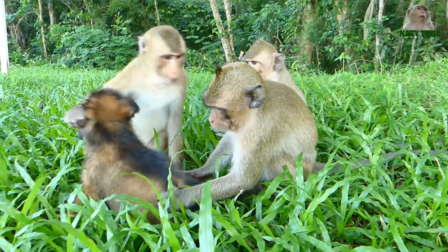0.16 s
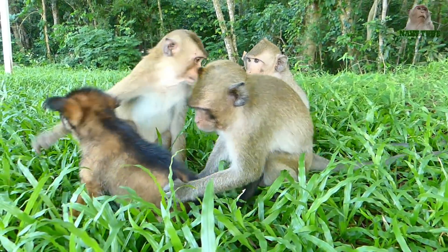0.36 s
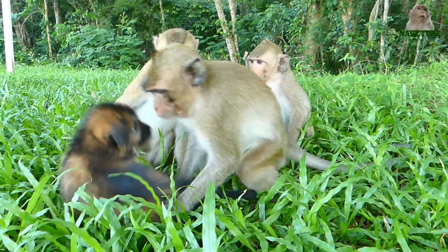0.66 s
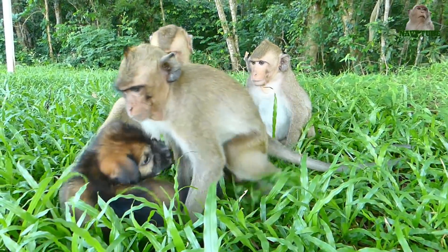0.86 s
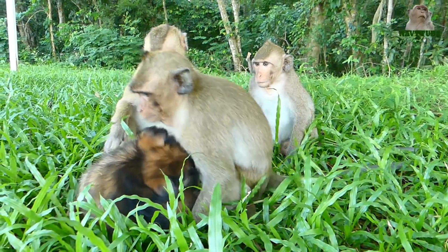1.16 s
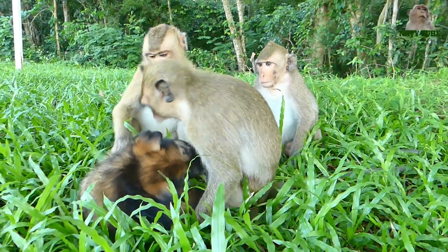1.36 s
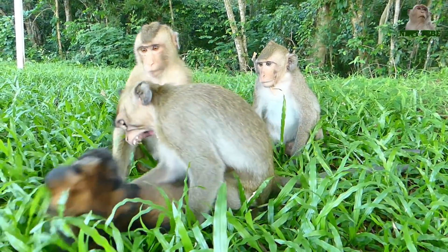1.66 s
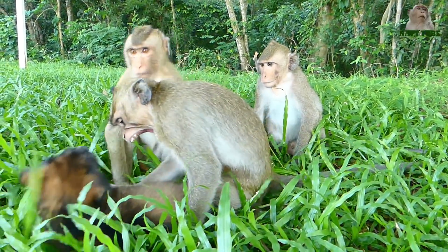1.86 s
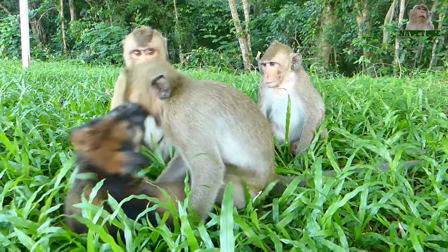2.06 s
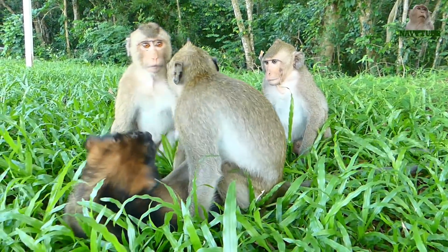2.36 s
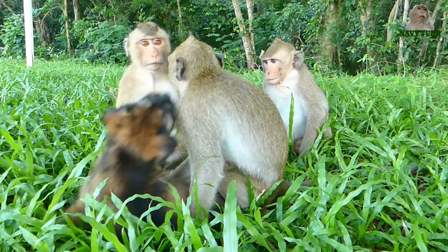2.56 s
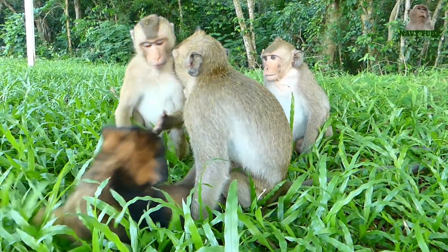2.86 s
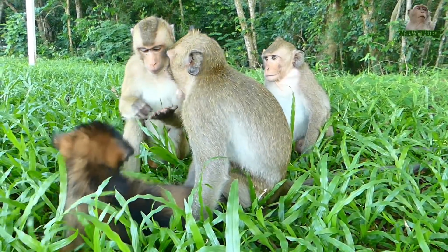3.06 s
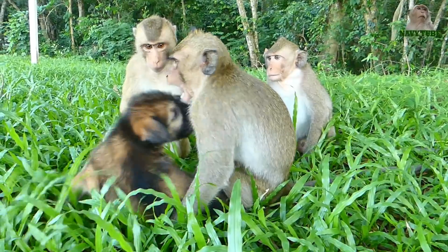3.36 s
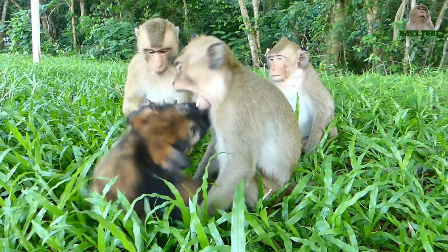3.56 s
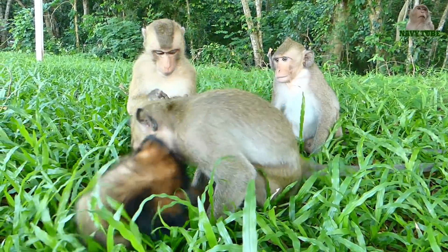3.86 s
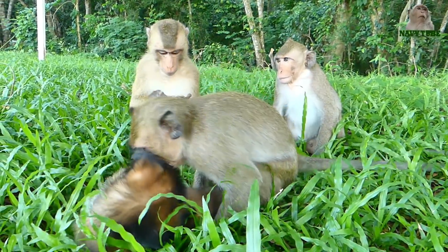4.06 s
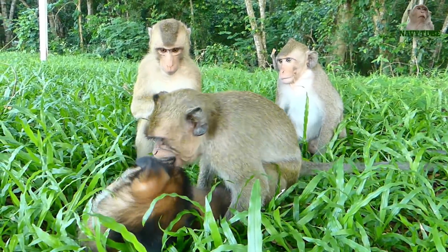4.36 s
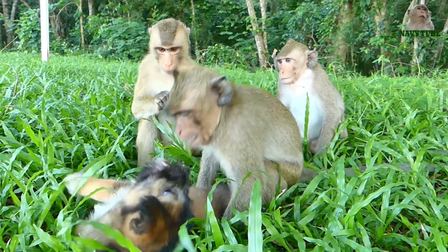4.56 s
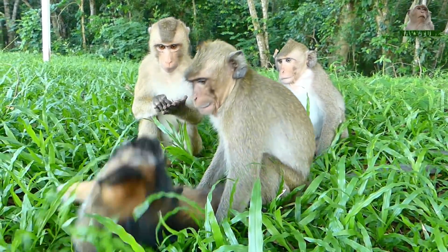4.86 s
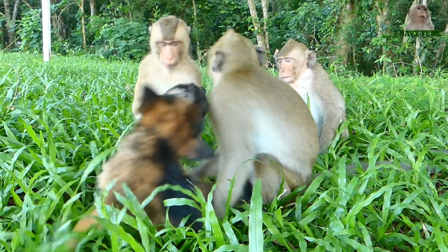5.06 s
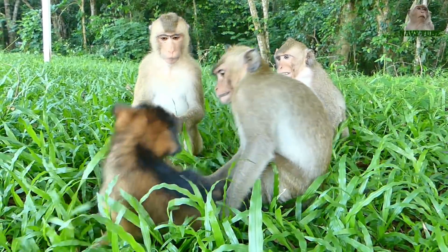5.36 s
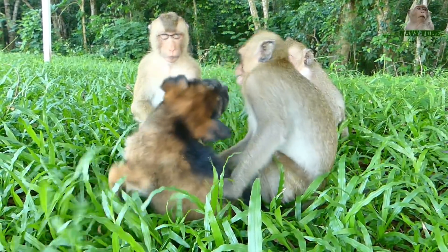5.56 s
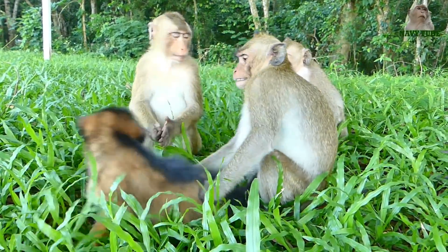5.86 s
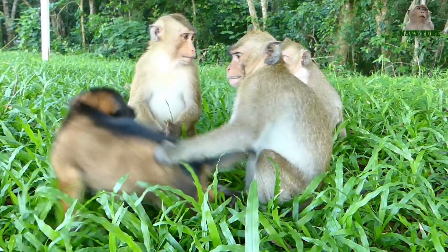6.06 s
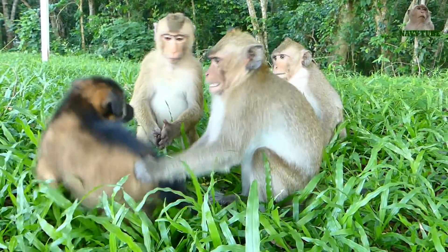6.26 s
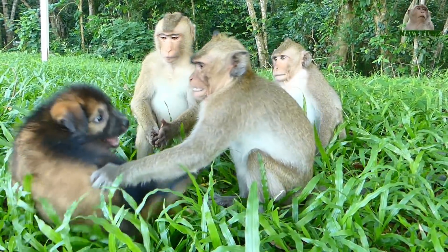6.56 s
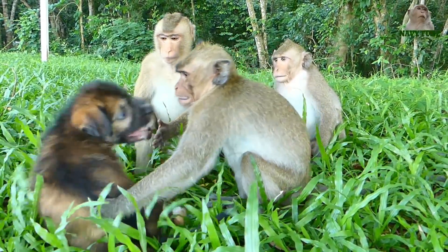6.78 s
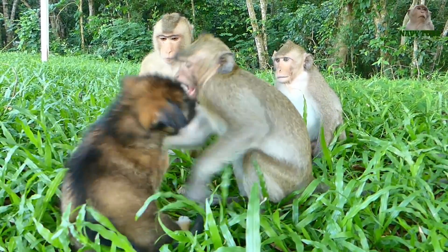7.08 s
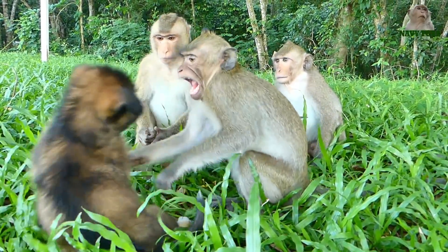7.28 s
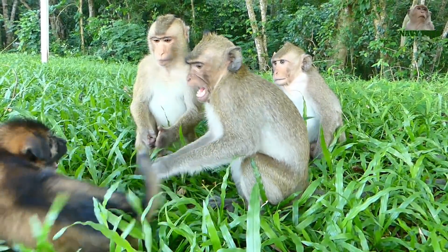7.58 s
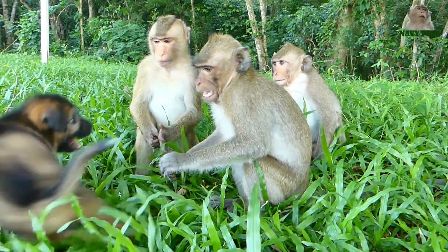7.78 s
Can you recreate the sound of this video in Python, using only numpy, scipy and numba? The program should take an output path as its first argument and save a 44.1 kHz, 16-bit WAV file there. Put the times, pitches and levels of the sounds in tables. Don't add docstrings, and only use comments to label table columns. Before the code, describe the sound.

Small engines hum beyond the trees while a young dog whimpers and yelps close by, its cries echoing, and a far horn toots.

```python
import sys
import numpy as np
from scipy import signal
from scipy.fft import rfft, irfft, next_fast_len
from scipy.io import wavfile
from scipy.ndimage import uniform_filter1d
from numba import njit

SR = 44100
rng = np.random.default_rng(int(sys.argv[2]) if len(sys.argv) > 2 else 0)


def file_out(sig):
    cols = np.atleast_2d(sig).T
    lim = np.clip(cols, -1, 1)
    pcm = np.round(lim * 32767).astype(np.int16)
    wavfile.write(sys.argv[1], SR, pcm)


def makeup_ratio(level_db):
    decades = np.asarray(level_db, float) / 20
    return 10 ** decades


N = 349260
T = np.arange(N) / SR


def read(table, t=T):
    s, *columns = np.transpose(table)
    return [np.interp(t, s, c) for c in columns]


def tone(table, hz):
    table_hz, value = np.transpose(table)
    return np.interp(np.log(hz), np.log(table_hz), value)


def unit(x):
    return x / np.sqrt(np.mean(x ** 2))


def walk(rate):
    k = int(SR / rate)
    held = np.repeat(rng.standard_normal(N // k + 1), k)
    return 1.66 * uniform_filter1d(uniform_filter1d(held, k), k)[:N]


def colour(x, table):
    size = next_fast_len(N)
    gain = makeup_ratio(tone(table, np.fft.rfftfreq(size, 1 / SR) + 1))
    return irfft(rfft(x, size) * gain, size)[..., :N]


def place(x, pan_db):
    return x * makeup_ratio(np.array([[pan_db / 2], [-pan_db / 2]]))


@njit
def svf(x, hz, width):
    y, b, l = np.empty(len(x)), 0., 0.
    for i in range(len(x)):
        g, k = np.tan(np.pi * hz[i] / SR), width / hz[i]
        v = (b + g * (x[i] - l)) / (1 + g * (g + k))
        b, l, y[i] = 2 * v - b, l + 2 * g * v, k * v
    return y


@njit
def follow(x, attack, release):
    y, e = np.empty(len(x)), 0.
    for i in range(len(x)):
        e += (x[i] - e) * (attack if x[i] > e else release)
        y[i] = e
    return y


def lines(hz, table, flutter_db, rate, blur):
    phase = 2 * np.pi * np.cumsum(hz) / SR
    total = 0
    for m, db in table:
        level = makeup_ratio(db + flutter_db * walk(rate))
        total = total + level * np.sqrt(2) * np.sin(m * phase + blur * walk(rate) + 7 * rng.random())
    return total


def bursts(rows, rise_s, fall_s):
    total = 0
    for s, hold, db in rows:
        before = np.clip((s - T) / rise_s, 0, 40)
        after = np.clip((T - s - hold) / fall_s, 0, 40)
        total = total + makeup_ratio(db) * np.exp(-before - after)
    return total


def air():
    # frequency in Hz, level in dB per Hz.
    spectrum = [(15, -61), (25, -45), (70, -13), (179, 1), (276, -8), (361, -11), (461, -16.5),
                (620, -19.5), (1010, -22.5), (1280, -22), (4100, -30.5), (4690, -30), (8050, -40.5),
                (11100, -36.5), (15800, -59)]
    # frequency in Hz, side minus mid in dB.
    spread = [(60, -20), (110, -9), (200, -9.5), (380, -6.5), (700, -8), (1290, -7), (2380, -7.5),
              (4400, -9.5), (8120, -9), (15000, -1)]
    # frequency in Hz, left minus right in dB.
    lean_db = [(60, 12), (110, -3.5), (200, 1.5), (380, 6), (700, 0.5), (1290, -0.5), (2380, 0),
               (4400, -0.5), (8120, 0.5), (15000, 1)]
    # frequency in Hz, left port's lead in radians.
    lead = [(0, 0), (260, 0.16), (690, 0.023), (4130, 0.065), (10900, -0.1), (11600, -0.0), (15700, -0.1)]
    swell = walk(1.3)
    rumble_db = -0.5 - 14.5 * np.exp(-((T - 4.7) / 2.3) ** 2)
    size = next_fast_len(N)
    f = np.fft.rfftfreq(size, 1 / SR) + 1
    mid, side = rfft(rng.standard_normal((2, size))) * makeup_ratio(tone(spectrum, f))
    side = side * makeup_ratio(tone(spread, f))
    lean = makeup_ratio(tone(lean_db, f) / 2) * np.exp(.5j * tone(lead, f))
    pair = np.array([(mid + side) * lean, (mid - side) / lean])
    out = 0
    for octave in np.arange(4, 15):
        band = irfft(pair * np.clip(1 - abs(np.log2(f) - octave), 0, 1), size)[:, :N]
        out = out + band * makeup_ratio(0.24 * swell + 1.0 * walk(6) + rumble_db * (octave < 7))
    return colour(unit(out), [(110, 0), (180, -4.5), (280, -1.5), (420, 0)]) * makeup_ratio(-35)


def engines():
    # time in seconds, firing rate in Hz.
    revs = [(1.2, 26.14), (1.55, 26.62), (1.85, 30.03), (1.97, 31), (2.26, 27.81), (2.6, 32.42),
            (2.98, 31.6), (3.29, 32.91), (3.72, 30.17), (4.1, 31.89), (4.6, 29.65), (5.07, 30.91),
            (5.47, 28.93), (5.97, 29.46), (6.61, 28.19), (6.85, 26.31), (7.28, 25.62), (7.92, 27.55)]
    # multiple of the firing rate when that is pipe_rate_hz, level in dB.
    pipe = [(1, -38), (2, -20.5), (3, -17), (4, -10), (5, -1.5), (6, 4), (7, -10.5), (8, -3.5), (9, -9.5),
            (10, -5), (11, -6.5), (12, -7), (13, -15), (14, -16), (15, -16), (16, -21), (17, -18),
            (18, -17)]
    # frequency in Hz, level in dB.
    steady_lines = [(127, -43.5), (170, -46.5), (212, -47.5), (256, -51.5), (298, -54), (357, -46.5),
                    (390, -49), (427, -51.5)]
    pipe_rate_hz = 31.1
    hz, = read(revs)
    multiples, pipe_db = np.transpose(pipe)
    ringing = [(m, np.interp(m * hz / pipe_rate_hz, multiples, pipe_db)) for m in range(1, 20)]
    near = unit(lines(hz, ringing, flutter_db=2.03, rate=9., blur=0.2))
    near *= makeup_ratio(-34 + 0.82 * (hz - pipe_rate_hz))
    near /= 1 + np.exp((0.9 - T) / 0.083)
    leaving = lines(np.ones(N), steady_lines, flutter_db=2.5, rate=6.67, blur=0.65) * makeup_ratio(2)
    leaving /= 1 + np.exp((T - 1.94) / 1)
    return place(near, 0.84) + place(leaving, 0.96)


def grass():
    # start in seconds, length in seconds, level in dB.
    rustles = [(.08, .02, -80), (.44, 0.37, -59.5), (.89, .11, -55.5), (1.39, 0.036, -80),
               (1.8, 0.098, -75), (2.05, .08, -75), (2.45, .1, -68), (2.9, 0.056, -61), (3.33, 0.057, -71),
               (3.6, 0.067, -71), (4.42, 0.15, -58), (5.24, 0.082, -51.5), (5.74, .07, -57),
               (6.18, 0.087, -59), (6.4, 0.051, -66), (7.41, 0.071, -53.5), (7.84, .1, -53.5)]
    # frequency in Hz, level in dB per Hz.
    blade_tone = [(1500, 2), (4000, 1), (7500, -1.5), (10000, -1), (12500, -5), (15000, -7)]
    ticks = rng.standard_normal((2, N)) * makeup_ratio(2.1 * rng.exponential(size=N) + 1.0 * walk(40))
    ticks = colour(ticks + 0.42 * ticks[::-1], blade_tone)
    bed = makeup_ratio(-63.5 + 1.5 * walk(4.))
    return unit(ticks) * makeup_ratio(5.5) * (bed + bursts(rustles, rise_s=0.026, fall_s=0.03))


def band_noise(hz, width):
    return svf(rng.standard_normal(N), 0 * T + hz, width)


def small_life():
    # frequency in Hz, width in Hz, level in dB.
    far_insects = [(4800, 500, -62), (11330, 1200, -69.5)]
    # length in seconds, level in dB.
    near_insect = (.28, -61)
    # length in seconds, level in dB, first pitch in Hz, sag in Hz per second.
    chip = (.04, -46, 6040, 2200)
    chorus = 0
    for hz, width, db in far_insects:
        narrow = svf(band_noise(hz, 1. * width), 0 * T + hz, 1. * width)
        chorus = chorus + unit(narrow) * makeup_ratio(db + 0.46 * walk(5.4))
    buzz = unit(band_noise(9200, 2200.)) * bursts([(.42, *near_insect)], .05, 0.059)
    chip_s = 7.8
    hold, db, hz, sag = chip
    pitch = hz - sag * np.clip(T - chip_s, 0, .07)
    bird = lines(pitch, [(1, 0)], flutter_db=2.5, rate=64.5, blur=.8)
    bird *= bursts([(chip_s + .01, hold, db)], .004, .013)
    return place(bird, 1.5) + place(buzz, .6) + chorus


def horn():
    # start in seconds, length in seconds, level in dB.
    blasts = [
        (4.085, 0.41, -36.5),
        (4.6, .2, -38),
        (4.855, 0.062, -28.5),
        (5.28, 0.0992, -32),
        (7.268, 0.18, -33),
    ]
    # pitch in Hz, level in dB.
    diaphragms = [
        (433.2, 0),
        (428.6, -3),
    ]
    # multiple of the pitch, level in dB.
    bell = [(6, -17), (7, -12), (8, -5.5), (9, -1), (10, -9), (11, -27), (19, -21), (20, -29.5), (21, -19)]
    attack_s, tail_db_per_s = 0.004, 25.5
    direct = bursts(blasts, attack_s, 0.0051)
    tail = makeup_ratio(-8.5) * bursts(blasts, attack_s, 20 / np.log(10) / tail_db_per_s)
    (high_hz, high_db), (low_hz, low_db) = diaphragms
    high = lines(high_hz + 0 * T, bell, flutter_db=3.5, rate=42., blur=1.6)
    low = lines(low_hz + 0 * T, bell[1:5] + bell[-1:], flutter_db=3.5, rate=33., blur=1.3)
    return (makeup_ratio(high_db) * high + makeup_ratio(low_db) * low) * np.maximum(direct, tail) * makeup_ratio(-9.0)


def cry(table, throat, bright, chest_hz, chest_width, chest_db, nasal, hard_db, pan_db):
    # multiple of its resonance, width in Hz, level in dB.
    cavities = [(1.43, 560, -4.5), (1.85, 910, -6.5)]
    (s0, hz0, db0, *rest0), (s1, hz1, db1, *rest1) = table[0], table[-1]
    onset = (s0 - .004, hz0, db0 - 33, *rest0)
    dying = (s1 + .018, hz1 * (1 - 0.196), db1 - 32, *rest1)
    table = [onset, *table, dying]
    start, stop = int(table[0][0] * SR), int(table[-1][0] * SR)
    hz, db, rough, mouth_hz = read(table, T[start:stop])
    rough = np.clip(rough, 0, 1)

    rest_hz, with_mouth, with_pitch = throat
    throat_hz = rest_hz + with_mouth * (mouth_hz - mouth_hz.mean()) + with_pitch * (hz - hz.mean())
    throat_hz = np.clip(throat_hz, 900, 6000)
    open_db, with_effort, octave_db = bright
    bright_db = open_db + with_effort * (db - db.max()) + octave_db * np.log2(hz / hz.mean())

    pitch_chance, size_chance = rng.standard_normal((400, 2)).T
    breath = rng.standard_normal(SR // 2)[:len(hz)]
    steady = (np.cumsum(hz) / SR).astype(int)
    phase = np.cumsum(hz * np.exp(.24 * rough * pitch_chance[steady])) / SR
    size = makeup_ratio(5.4 * rough * size_chance[(phase + .5).astype(int)])

    k = np.arange(1, 50)[:, None]
    reach = 1 / (1 + (k * hz / 7150) ** 40) + makeup_ratio(-12) * np.exp(-((k * hz - 12500) / 2500) ** 2)
    reach *= makeup_ratio(hard_db * np.clip(np.log2(k * hz / 2400), 0, 2))
    snaps = np.sum(np.cos(2 * np.pi * k * phase) * reach, axis=0) / np.sqrt(3600 / hz)
    hiss = svf(svf(breath, 0 * hz + 3000, 5000.), 0 * hz + 3500, 5500.)
    puff = np.cos(np.pi * phase) ** 2 * hiss
    folds = size * snaps + 1.8 * (rough + 0.034) * makeup_ratio(hard_db) * puff

    skull = 0
    for n, (multiple, width, cavity_db) in enumerate(cavities):
        skull = skull + (-1) ** n * makeup_ratio(cavity_db) * svf(folds, multiple * throat_hz, 1. * width)
    upper = makeup_ratio(0.31 * (db + 12)) * skull - svf(svf(folds, throat_hz, 1950.), throat_hz, 930.)
    mouth = svf(svf(folds, mouth_hz, 0.16 * mouth_hz.mean()), mouth_hz, 1.07 * mouth_hz.mean())
    voice = mouth + makeup_ratio(bright_db) * upper
    voice -= makeup_ratio(chest_db) * svf(folds, 0 * hz + chest_hz, 1. * chest_width)
    voice -= nasal * svf(voice, 0 * hz + 923, 340.)
    voice /= np.sqrt(uniform_filter1d(voice ** 2, int(0.011 * SR)) + 1e-9)
    return place(np.pad(-voice * makeup_ratio(db), (start, N - stop)), pan_db)


def puppy():
    # time in seconds, pitch in Hz, level in dB, roughness 0-1, mouth resonance in Hz.
    whine_rise = [(4.274, 409.5, -43, 0.7, 1510), (4.285, 416.6, -28, 0.35, 1579),
                  (4.3, 424, -21.5, 0.13, 1650), (4.32, 411, -20.5, 0.06, 1600),
                  (4.338, 425, -14.5, 0.09, 1700), (4.36, 454.5, -17.5, 0, 1800),
                  (4.384, 506, -22, 0.09, 1960), (4.397, 558, -14.5, 0.2, 1650)]
    whine_top = [(4.402, 711, -19.5, .01, 1920), (4.441, 715, -17, 0.053, 1870),
                 (4.463, 704.5, -18, .02, 1890), (4.487, 743.5, -15, 0.016, 1570),
                 (4.517, 755, -14.5, 0.018, 1550), (4.542, 737, -16, 0.021, 1630),
                 (4.553, 728, -18.5, 0.49, 1460), (4.564, 642, -21, 0.16, 1470),
                 (4.572, 586, -38, 0.14, 1300)]
    grunt = [(4.73, 148.8, -37, 0.35, 400), (4.795, 160.8, -29.5, 0.55, 520),
             (4.822, 158.3, -23, 0.75, 636), (4.829, 281.7, -24, 0.73, 594), (4.85, 293.6, -20, 0.38, 410),
             (4.865, 290, -22.5, 0.35, 392), (4.88, 282, -29, .5, 337), (4.9, 265.7, -60, 0.25, 330)]
    yelp_1 = [(5.012, 487, -11.5, 0.2, 1870), (5.022, 472, -11.5, 0.39, 1780), (5.031, 426, -5, .38, 1790),
              (5.04, 440, -9, 0.23, 1796), (5.044, 859, -3, 0.085, 1750), (5.064, 937, -2, .08, 1900),
              (5.07, 1131, -10, 0.18, 1720), (5.088, 1008, -10.5, 0.13, 1800),
              (5.105, 740, -14, 0.58, 1460)]
    yelp_2 = [(5.512, 401, -20, 0.87, 1720), (5.518, 395, -14.5, 0.52, 1580), (5.527, 532, -12, 0.17, 1640),
              (5.542, 686, -11, 0.36, 1890), (5.548, 592, -12.5, 0.78, 1600), (5.56, 896, -10, .1, 1870),
              (5.576, 878, -7, .01, 1760), (5.586, 817, -9, .08, 1830), (5.599, 600, -26.5, .05, 1250)]
    yelp_3 = [(6.897, 470.7, -30, 0.71, 1830), (6.904, 472.5, -17.5, 0.9, 1840),
              (6.908, 490.5, -16, 0.4, 1880), (6.922, 605, -11.5, 0.49, 2070), (6.93, 850, -12, 0.23, 1930),
              (6.943, 930, -11.5, .01, 2070), (6.956, 951, -10, 0.066, 2020), (6.965, 860, -21, .02, 1970),
              (6.979, 672, -20, .07, 1420)]
    # throat resonance in Hz, share of mouth motion, share of pitch motion.
    throats = [(3650, -0.42, -3.5), (3100, 2.1, 2), (1550, -1.1, -0.1), (3230, 0.78, 3.2), (3047, -0.48, 2),
               (3450, 0.46, 2.5)]
    # brightness in dB, dB per dB of effort, dB per octave of pitch.
    brights = [(-12, -0.3, 9), (-2, 2.9, 12), (0.5, 3.5, -3), (-14, -0.06, -3.5), (-6.5, 0.6, -1.5),
               (-12, 0.6, -4.5)]
    # chest resonance in Hz, width in Hz, level in dB, nasality 0-1,
    # snap hardness in dB, left minus right in dB.
    chests = [
        (440, 270, -13.5, 1, -3.5, 4),
        (692, 190, -14.5, 0.4, -2, 3),
        (330, 93, -6.5, 0.5, 0.5, 4),
        (926, 250, -8.5, 0.81, 3, 3),
        (850, 425, -13, 0.5, 1.5, 2.5),
        (990, 280, -7, 0.83, 3.5, 3),
    ]
    cries = [whine_rise, whine_top, grunt, yelp_1, yelp_2, yelp_3]
    settings = zip(cries, throats, brights, chests)
    return sum(cry(table, throat, bright, *chest) for table, throat, bright, chest in settings)


def ports(x):
    # frequency in Hz, left minus right in dB.
    lean_db = [(60, -1.0), (110, 0.5), (200, -3), (380, 1), (700, -3.5), (1290, -0.5), (2380, -5),
               (4400, -1.5), (8120, 0), (15000, -7)]
    # frequency in Hz, left port's lead in radians.
    lead = [(0, 0), (260, 0.11), (690, -0.52), (1460, -0.046), (1810, -0.39), (2070, 0.28), (4220, 0.4),
            (5680, 0.0), (6550, -0.49), (8270, 0.1), (8960, -0.091), (9470, -0.0), (11100, -0.0),
            (15700, 0.0)]
    size = next_fast_len(N)
    f = np.fft.rfftfreq(size, 1 / SR) + 1
    half = makeup_ratio(tone(lean_db, f) / 2) * np.exp(.5j * tone(lead, f))
    return irfft(rfft(x, size) * np.array([half, 1 / half]), size)[:, :N]


def forest(x):
    t = T[:SR]
    wash = rng.standard_normal((2, SR)) * makeup_ratio(-60 * t / 0.95) * np.clip(t / 0.04, 0, 1)
    wash += 2.8 * np.array([svf(c, 0 * t + 2750, 600.) for c in wash])
    returns = [(.04, 13), (.085, 3.3), (.14, 2.5)]
    trunks = sum(makeup_ratio(db) * np.exp(-((t - s) / 0.0014) ** 2) for s, db in returns)
    echo = signal.lfilter([1, -.85], [1], wash * (1 + trunks))
    echo = echo + 0.49 * echo[::-1]
    return signal.fftconvolve(x[None], echo / np.sqrt(np.sum(echo ** 2) / 2))[:, :N]


def scene():
    voice, blare = puppy(), horn()
    near = ports(voice) + makeup_ratio(-13.5) * forest(voice.mean(axis=0))
    far = place(blare, .9) + makeup_ratio(-9) * forest(blare)
    return near + far + engines() + small_life() + grass() + air()


def top_cut(x):
    return signal.sosfilt(signal.butter(12, 16130, fs=SR, output="sos"), x)


def record(dry):
    loud = follow(abs(dry).max(axis=0), 1 / (.001 * SR), 1 / (.02 * SR))
    over_db = 1.8 * np.clip(20 * np.log10(loud + 1e-9) + 10.73, 0, 9)
    cut_db = follow(over_db, 1 / (0.015 * SR), 1 / (.15 * SR))
    wet = np.tanh(dry * makeup_ratio(-cut_db))
    wet = wet - .75 * np.array([svf(c, 0 * T + 7550, 160.) for c in wet])
    wet = signal.sosfilt(signal.ellip(8, .2, 60, 15450, fs=SR, output="sos"), wet)
    return top_cut(wet)


dry = scene()
out = record(dry)
file_out(out)
```